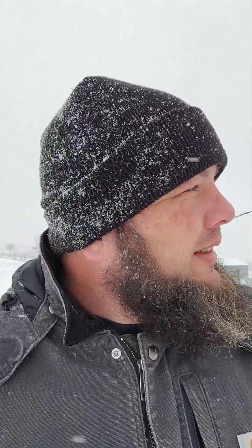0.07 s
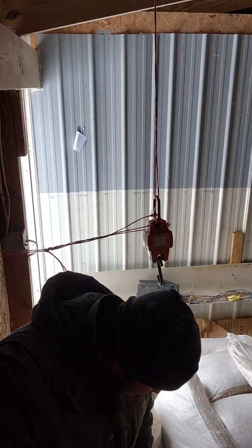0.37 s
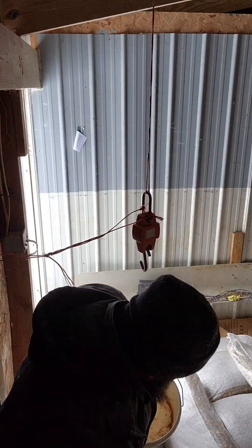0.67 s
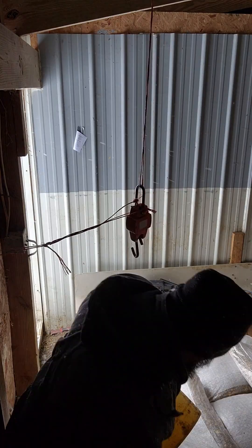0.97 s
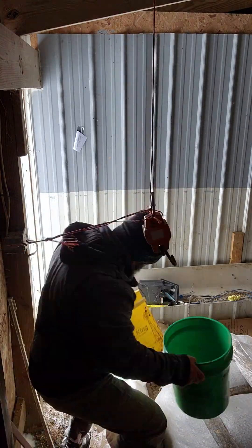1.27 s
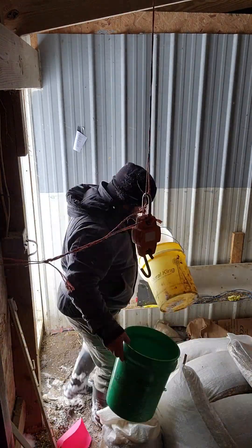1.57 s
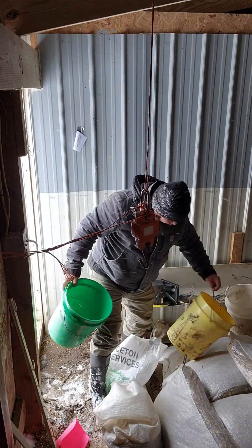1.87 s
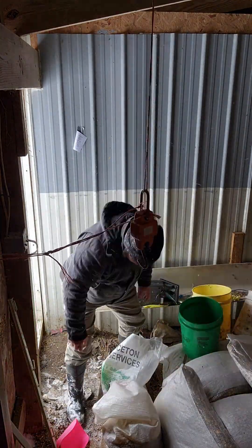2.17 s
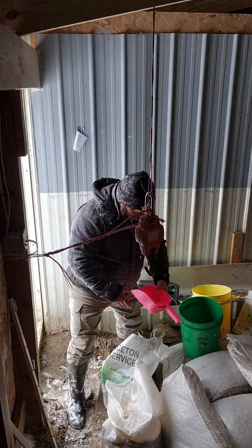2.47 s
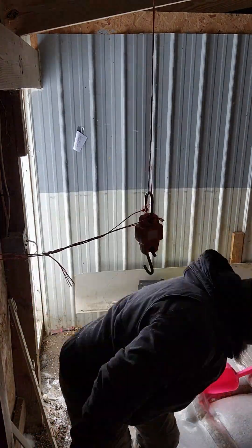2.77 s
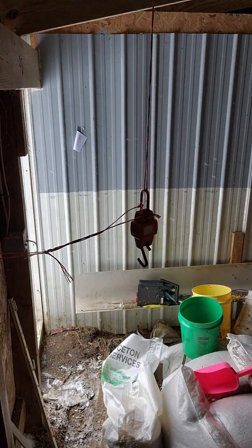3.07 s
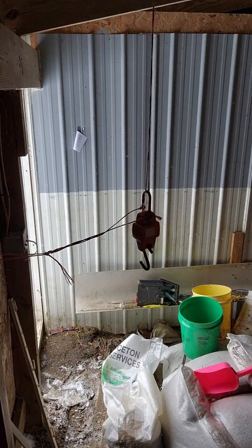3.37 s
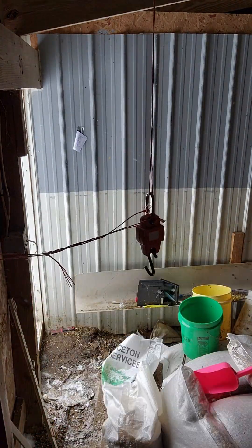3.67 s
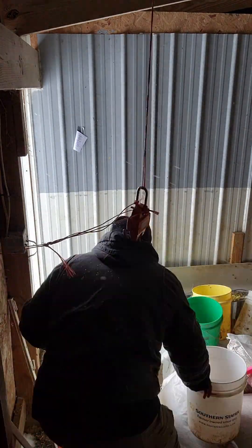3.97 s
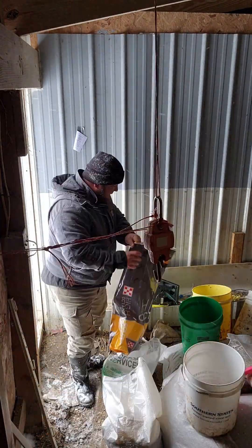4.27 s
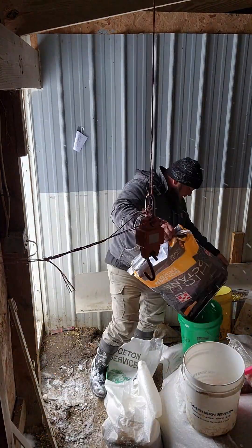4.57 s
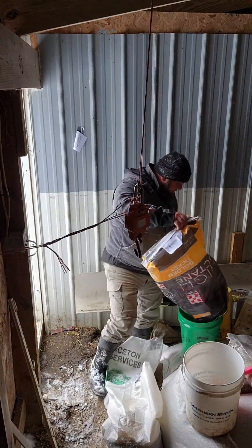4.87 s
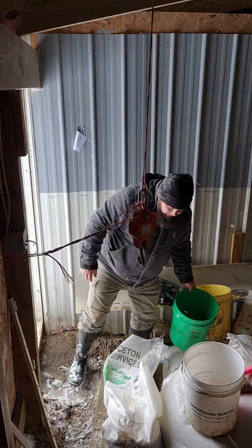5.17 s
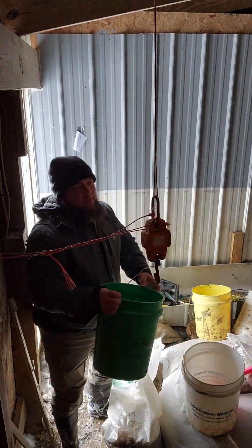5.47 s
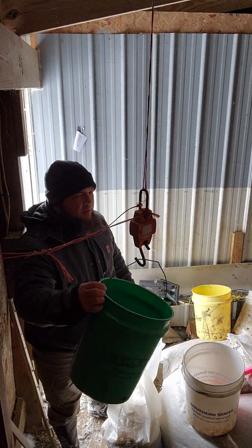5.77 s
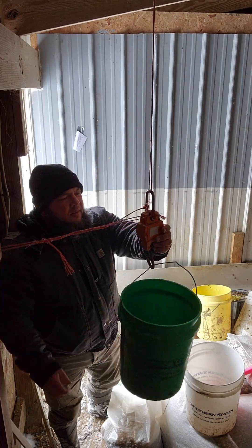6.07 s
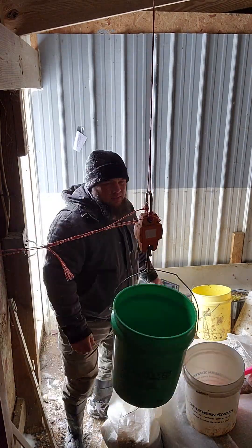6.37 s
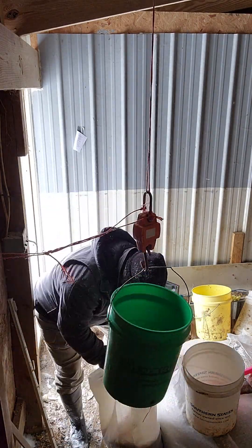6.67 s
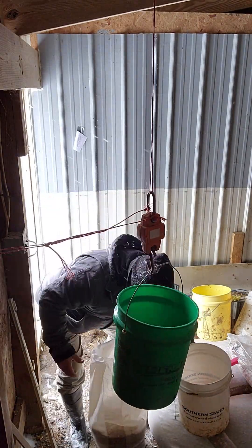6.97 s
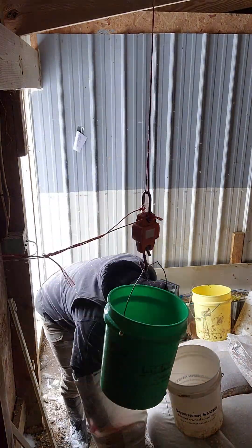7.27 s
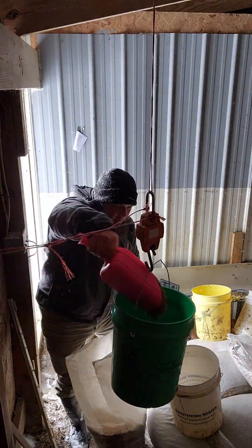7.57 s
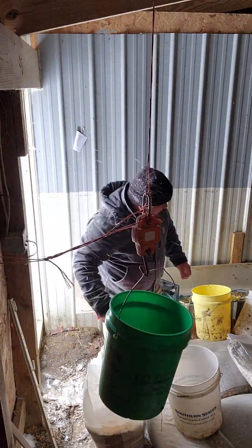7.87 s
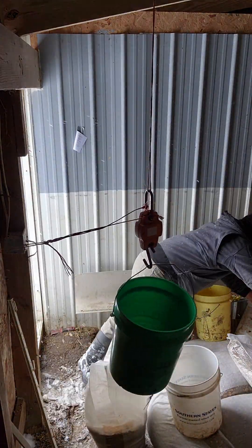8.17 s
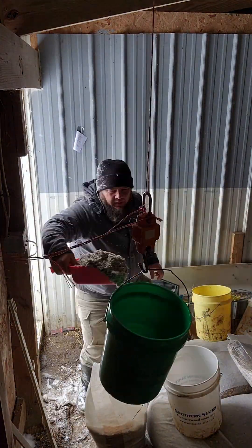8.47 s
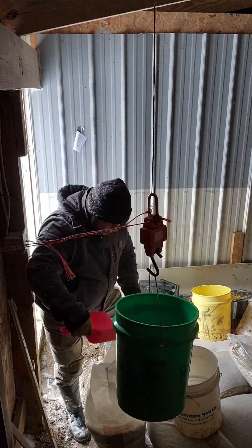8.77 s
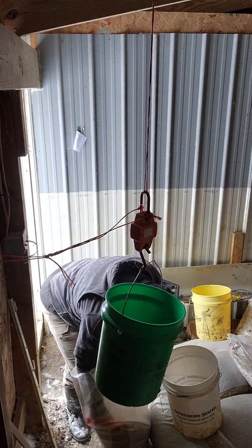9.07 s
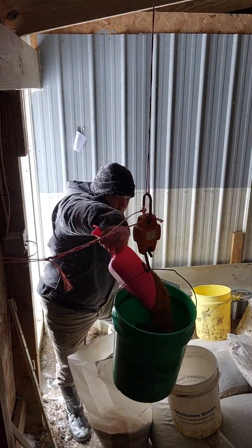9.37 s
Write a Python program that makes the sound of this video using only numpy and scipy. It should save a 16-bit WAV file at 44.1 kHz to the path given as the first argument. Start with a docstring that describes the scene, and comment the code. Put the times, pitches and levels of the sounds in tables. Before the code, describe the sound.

Plastic buckets clatter with ringing wire handles, followed by a crinkling feed sack, a short pour of pellets and quiet scooping.

```python
"""A gust buffets the microphone. Then, in a sheet-metal feed shed, a man in a stiff coat sorts plastic
buckets: wire handles clack and ring, walls knock and scuff, the coat rubs. A feed sack crackles as its
folds buckle and is emptied into a bucket in a stream of grains. He hangs a bucket on the scale hook,
then digs a plastic scoop into a sack, pellets rasping. The steel walls return a short echo of each
contact; a dull wash of wind and shuffling lies underneath."""
import sys
import numpy as np
from scipy import signal
from scipy.fft import rfft, irfft, next_fast_len
from scipy.io import wavfile
from scipy.ndimage import uniform_filter1d, map_coordinates

SR = 44100
rng = np.random.default_rng(int(sys.argv[2]) if len(sys.argv) > 2 else 0)


def wav_record(signal):
    """Record a signal, one row per channel, as 16-bit PCM in the file named by sys.argv[1]."""
    frames = np.transpose(np.atleast_2d(signal))
    bounded = np.clip(frames, -1, 1)
    # unit amplitude maps onto the largest positive 16-bit level
    quanta = np.round(bounded * 32767).astype(np.int16)
    wavfile.write(sys.argv[1], SR, quanta)


N = 415863
AGE_S = np.arange(SR // 5) / SR  # time since a contact

# bucket wall modes: pitch_hz, level_db, t60_s
WALL_MODES = [(134.5, -9.5, 0.22), (200, -6.5, .16), (288, -2.5, 0.077), (410, -2.5, 0.04),
              (480, -2.5, 0.033), (554, -2.5, 0.1), (634, -1, 0.049), (779, 3, 0.042), (897, -3.5, 0.063),
              (1046, 1, 0.058), (1148, 8, 0.032), (1423, 5, 0.046), (2014, 8.5, 0.028)]
# rim rattle: freq_hz, density_db
RIM_SPECTRUM = [(700, -40.5), (1500, -8), (2200, 2.5), (2700, -1.5), (3800, 5), (5500, 0), (8000, -5),
                (16000, -45)]
# bright crack: freq_hz, density_db
CRACK_SPECTRUM = [(2500, -38.5), (6000, -3), (8000, -0.5), (11500, 4.5), (15500, 2.5)]
# hard click: freq_hz, density_db
CLICK_SPECTRUM = [(500, -10.5), (2000, 5.5), (3400, 1.5), (4500, -5), (5600, 5.5), (7000, 3), (9000, -2),
                  (12500, 2.5), (16000, 6.5)]
# blows on a bucket: start_s, wall_db, centre_hz, rim_db, crack_db
BUCKET_KNOCKS = [(0.524, -34, 640, -42, -37), (.578, -32, 856, -54, -39), (1.098, -26.5, 880, -42, -51),
                 (1.18, -31.5, 523, -44, -54), (1.206, -26, 1140, -35, -40),
                 (1.221, -26.5, 915, -21, -27.5), (1.231, -30, 450, -21, -31), (1.2535, -32, 905, -25, -31),
                 (1.309, -32, 825, -40, -34.5), (1.463, -36, 726, -26.5, -44),
                 (1.509, -42.5, 805, -39, -42), (1.578, -38.5, 676, -38.5, -40.5),
                 (1.94, -27.5, 560, -36, -22.5), (1.955, -29.5, 496, -36.5, -21),
                 (1.969, -28, 490, -34, -23), (2.059, -37, 447, -40.5, -31.5),
                 (2.073, -36, 520, -36.5, -21.5), (2.088, -36, 427, -43, -36), (2.106, -31, 752, -35, -22),
                 (2.141, -42, 780, -36, -19.5), (2.167, -48, 905, -47, -30), (3.084, -34.5, 670, -38, -47),
                 (3.238, -34.5, 814, -31.5, -29), (3.428, -38.5, 970, -46, -29.5),
                 (3.485, -32, 810, -47, -31), (3.693, -28.5, 780, -35, -40), (5.016, -46, 613, -35.5, -26),
                 (5.414, -40, 930, -41, -46.5), (7.63, -43, 215, -48, -30), (8.122, -37.5, 544, -51, -40.5),
                 (8.13, -47, 130, -48, -58), (8.264, -43, 603, -50, -47), (8.611, -52, 201, -42, -38.5),
                 (8.658, -54.5, 592, -57, -39), (8.706, -54, 190, -52.5, -48.5),
                 (9.394, -45.5, 238, -46, -44), (9.411, -61, 261, -63, -38)]


def bucket_knocks():
    """The wall booms in the modes near centre_hz, under a rim rattle and a bright crack."""
    usual_t60_s, usual_rim_db, halving_db = 0.038, -37.5, 36.5
    out = np.zeros((2, N))
    for start_s, wall_db, centre_hz, rim_db, crack_db in BUCKET_KNOCKS:
        modes = [(hz, db - 11 * abs(np.log2(hz / centre_hz)) ** 1.2, t60) for hz, db, t60 in WALL_MODES]
        wall = amp(wall_db - 2.5) * ring(modes, scatter_db=5.5, skew_rad=1.0)
        t60_s = usual_t60_s * 2 ** ((usual_rim_db - rim_db) / halving_db)  # harder blows die faster
        crack = burst(CRACK_SPECTRUM, t60_s)
        impact = amp(-10.5) * burst(CLICK_SPECTRUM, t60_s=0.009, rise_s=0.0003)
        rim = amp(rim_db - 4) * burst(RIM_SPECTRUM, t60_s)
        add(out, start_s, wall + rim + amp(crack_db - 2.5) * (crack + impact))
    return out


# modes of a struck part: pitch_ratio, level_db, t60_share
PART_MODES = [(1, 5, 0.79), (0.3, -10, 0.65), (1.1, -9, 1), (0.75, -7.5, 0.5), (1.8, -16, 0.76)]
# wire handle modes: pitch_hz, level_db
WIRE_MODES = [(2750, -4.5), (5450, 2), (5750, 4.5), (6350, -2), (7450, -2.5), (8400, -5), (9300, -7),
              (11150, -1), (11760, 0.5), (12750, -1.5), (14700, -7)]
# balance of a ring: pitch_hz, left_minus_right_db
RING_PAN = [(1120, 0), (1280, 4), (1550, 9), (1950, 3), (2080, -6.5), (3400, 1), (4200, 2), (5200, -11)]
# handles, hook, scoop and loose gear: start_s, click_db, pitch_hz, ring_db
GEAR_CLACKS = [(.205, -34, 1505, -35.5), (.217, -40, 1530, -34), (.228, -31.5, 2090, -39),
               (.252, -44, 1380, -45), (.298, -44.5, 1400, -50), (0.329, -31, 1380, -22.5),
               (0.33, -40, 1207, -25.5), (.579, -22.5, 2080, -14), (.58, -31, 3510, -23.5),
               (.581, -43, 1570, -27), (.699, -39.5, 2050, -38), (0.781, -39, 1385, -30),
               (.794, -40, 1277, -20.5), (.988, -49, 6300, -49.5), (1.026, -39.5, 1120, -32.5),
               (1.099, -35.5, 1230, -31), (1.437, -40.5, 3400, -33), (1.465, -47, 3350, -27.5),
               (1.487, -50, 3430, -32), (1.759, -44, 1294, -36.5), (2.1054, -23, 2050, -28),
               (3.628, -37, 985, -21.5), (3.655, -29.5, 1115, -28), (3.695, -27, 1145, -12),
               (3.696, -50, 5180, -28.5), (3.717, -41, 5180, -35.5), (4.585, -58, 2010, -37),
               (5.359, -44, 2170, -40), (5.377, -51, 2200, -39.5), (5.828, -56, 4230, -62),
               (6.38, -55, 2200, -59), (7.622, -28, 1922, -45), (8.613, -44, 1990, -40),
               (9.392, -30.5, 1930, -37)]


def gear_clacks():
    """A hard contact clicks, shakes the wire and rings briefly at the pitch of the struck part."""
    t60_cycles, wire_t60_s = 68, 0.05
    wire_modes = [(hz, db, wire_t60_s) for hz, db in WIRE_MODES]
    out = np.zeros((2, N))
    for start_s, click_db, pitch_hz, ring_db in GEAR_CLACKS:
        modes = [(pitch_hz * ratio, db, t60_cycles / pitch_hz * share) for ratio, db, share in PART_MODES]
        pan_db = along(RING_PAN, pitch_hz)
        tone = ring(modes, scatter_db=0.5, skew_rad=0.86) * amp([[pan_db / 2], [-pan_db / 2]])
        click = amp(-6) * burst(CLICK_SPECTRUM, t60_s=0.059)
        wire = amp(-12) * ring(wire_modes, scatter_db=5, skew_rad=1.0)
        add(out, start_s, amp(ring_db - 7) * tone + amp(click_db) * (click + wire))
    return out


# slides of bucket, sack and scoop: start_s, length_s, level_db
SLIDES = [(0.535, .043, -42), (0.569, 0.014, -36), (0.583, 0.033, -45.5), (0.781, 0.032, -33.5),
          (1.095, .026, -41.5), (1.231, 0.028, -40), (1.332, 0.029, -41.5), (1.397, .05, -51),
          (1.476, .11, -45), (1.857, .09, -48.5), (1.945, .04, -42), (2.544, 0.048, -51),
          (3.423, 0.011, -34.5), (5.356, 0.033, -41.5), (6.813, .068, -58), (7.598, 0.04, -48)]


def scuffs():
    """Quick stick and slip swells and dies within each short slide."""
    out = np.zeros((2, N))
    slips = grains(per_s=560, spread_db=7, life_s=0.001, bed=0.3)
    for start_s, length_s, level_db in SLIDES:
        size = round(length_s * SR)
        scrape = noise(CLICK_SPECTRUM, size, slips[round(start_s * SR):][:size])
        add(out, start_s, amp(level_db) * scrape * signal.windows.tukey(size, 0.5))
    return out


# dull flap: freq_hz, density_db
FLAP_SPECTRUM = [(80, -46.5), (200, -33), (450, 6.5), (950, 13), (1400, -1), (2500, -38.5)]
# sharp snaps of sack and coat, and dull knocks of the scoop: start_s, flap_db, crinkle_db
SNAPS_AND_KNOCKS = [(1.7305, -52, -44.5), (1.772, -70, -42), (2.266, -60, -54), (2.547, -52, -45.5),
                    (2.561, -44, -52), (2.658, -42, -49.5), (2.773, -44, -60), (2.927, -34.5, -50.5),
                    (2.946, -35, -46.5), (2.974, -40, -53), (3.0185, -37, -51), (3.203, -32, -32.5),
                    (3.5125, -40, -41), (3.5826, -49, -34), (3.655, -28, -35.5), (3.749, -37, -36.5),
                    (3.784, -35, -37), (3.845, -40, -35), (3.881, -37, -52), (3.909, -45, -42),
                    (3.973, -37.5, -37), (4.06, -43, -41), (4.11, -35.5, -33.5), (4.2275, -40, -29),
                    (4.302, -40, -31.5), (4.484, -42.5, -37), (4.98, -47, -34), (5.024, -46, -29.5),
                    (5.125, -36.5, -31.5), (5.218, -51, -51), (5.314, -71, -50), (5.342, -41.5, -45),
                    (5.986, -63, -52.5), (6.047, -73, -58.5), (6.657, -46.5, -52.5), (6.877, -46.5, -52.5),
                    (7.171, -40.5, -56), (7.821, -43, -55), (7.977, -43.5, -61), (8.043, -43, -61),
                    (8.199, -45, -50), (8.3035, -44, -58), (8.422, -50, -69), (8.96, -45, -51.5)]


def snaps(rows):
    """A fold buckles or the scoop knocks: a dull flap, a bright crinkle and a tick that grows with both."""
    out = np.zeros((2, N))
    for start_s, flap_db, crinkle_db in rows:
        flap = amp(flap_db - 5) * burst(FLAP_SPECTRUM, t60_s=0.053, rise_s=0.0022)
        tick = amp((flap_db + crinkle_db) / 2 - 6.5) * burst(RIM_SPECTRUM, t60_s=0.054, rise_s=0.0006)
        crinkle = amp(crinkle_db - 1.5) * burst(CRACK_SPECTRUM, t60_s=0.032, rise_s=0.0046)
        add(out, start_s, flap + tick + crinkle)
    return out


def small_folds(rubbing):
    """Folds buckle by chance while something rubs, in proportion to the rubbing."""
    tries_per_s, scatter_db, threshold_db = 6.2, 2.5, -75
    when, size = rng.random((int(tries_per_s * N / SR), 2)).T
    rub_db, hiss_db = 20 * np.log10(rubbing[:, (when * N).astype(int)]) + scatter_db * (2 * size - 1)
    flap_db, crinkle_db = rub_db + 11.5, hiss_db + 8
    folds = np.transpose([when * N / SR, flap_db, crinkle_db])
    return snaps(folds[rub_db > threshold_db])


# falling feed: freq_hz, density_db
POUR_SPECTRUM = [(900, -31.5), (1200, -8.5), (1750, -21.5), (2000, -3.5), (2200, -10.5), (2710, -15),
                 (3740, -3.5), (4910, -14), (5650, -2), (6300, -7.5), (7820, -6.5), (11200, -0.5),
                 (13300, -5.5), (15200, -8.5)]
# flow from the tipped sack: time_s, rush_db, hiss_db
POUR_FLOW = [(4.17, -66, -66), (4.2, -53.5, -47), (4.35, -56.5, -51), (4.4, -45.5, -43), (4.5, -51.5, -41),
             (4.57, -46.5, -33), (4.67, -50, -39.5), (4.9, -45.5, -42.5), (5.0, -53.5, -53)]


def feed_pour():
    """A dense stream of pellets into the bucket swells, thins and stops."""
    pellets = grains(per_s=1500, spread_db=3.5, life_s=0.004, bed=0.46)
    return amp(2) * friction(gains(POUR_FLOW), POUR_SPECTRUM, pellets, split_hz=7160)


# stiff sack: freq_hz, density_db
SACK_SPECTRUM = [(530, -20), (900, -2.5), (1200, -3), (1650, -18), (2020, -8.5), (2500, -6), (3750, -3),
                 (4800, -8.5), (5650, -2.5), (6800, -2.5), (8500, -4), (11200, -5.5), (13300, -4),
                 (16000, -3.5)]
# grips on the sack: start_s, length_s, flap_db, crinkle_db
SACK_GRIPS = [(3.17, 0.095, -45, -39.5), (3.27, .15, -51.5, -49), (3.47, 0.041, -43.5, -42),
              (3.6, 0.14, -48, -45.5), (3.77, 0.091, -48.5, -43), (3.91, 0.035, -46.5, -46),
              (3.96, 0.057, -63.5, -62), (4.065, 0.068, -50.5, -49), (4.14, 0.067, -60.5, -62),
              (5.05, 0.039, -51, -45), (5.125, 0.038, -56.5, -50)]


def sack_crumple():
    """The stiff sack crumples in coarse grains at each grip."""
    grips = strokes(SACK_GRIPS, rise_s=0.0091, fall_s=0.0034)
    creases = grains(per_s=500, spread_db=6.5, life_s=0.0051, bed=0.18)
    return friction(grips, SACK_SPECTRUM, creases, split_hz=6100)


# pellets on plastic: freq_hz, density_db
RASP_SPECTRUM = [(900, -30), (1500, -4), (1700, -12), (2040, -2), (2500, -9), (3200, -2), (3900, 3),
                 (5100, -7), (7200, -4), (8900, -8), (12000, -5), (14900, -5), (16000, -11)]
# sack mouth and scoop sliding over feed: start_s, length_s, rub_db, hiss_db
SCOOP_DIGS = [(6.54, 0.34, -63, -64.5), (6.9, .27, -65.5, -74), (7.17, .3, -57, -61.5),
              (7.48, 0.21, -65.5, -68), (7.79, .2, -66, -66.5), (8.05, 0.27, -61, -59.5),
              (8.48, 0.25, -67, -64.5), (8.89, 0.3, -59, -67), (9.13, 0.15, -58, -57),
              (9.32, 0.13, -66.5, -65)]


def scoop_rasp(digs):
    """Pellets rasp on the scoop with each dig."""
    pellets = grains(per_s=220, spread_db=7, life_s=0.0045, bed=1.0)
    return friction(digs, RASP_SPECTRUM, pellets, split_hz=10000)


# stiff cloth: freq_hz, density_db
COAT_SPECTRUM = [(880, -35), (1500, -1), (1670, -23.5), (2040, 0), (2490, -13), (2770, -3), (3180, -2),
                 (3880, 1), (5120, -7.5), (7170, -5.5), (8920, -9), (12900, -6), (13900, -7.5), (14900, -4),
                 (16000, -17)]
# bends and reaches, and last a faint scrape in the lull: start_s, length_s, rub_db, hiss_db
COAT_RUBS = [(.51, 0.068, -70, -78), (.7, 0.16, -63, -70), (.96, 0.11, -74, -74), (1.39, 0.16, -66, -79),
             (1.67, 0.35, -68, -66.5), (2.26, 0.082, -63, -63.5), (2.56, 0.27, -73, -73),
             (2.92, 0.22, -62.5, -71), (5.18, 0.43, -72.5, -71.5), (5.56, 0.075, -78, -65),
             (5.7, .35, -79.5, -83)]


def coat_rustle(rubs):
    """Cloth rubs in fine grains as he reaches, and stirs faintly until he stands at the scale."""
    start_s, end_s, rub_db, hiss_db = 0.23, 5.55, -75, -81
    stir = strokes([(start_s, end_s - start_s, rub_db, hiss_db)], fall_s=0.62)
    slips = grains(per_s=670, spread_db=12.5, life_s=0.0039, bed=0.6)
    return friction(rubs + stir, COAT_SPECTRUM, slips, split_hz=8900)


# wind on the microphone: freq_hz, density_db
GUST_SPECTRUM = [(15, -43), (25, -9), (113, 0), (219, -10.5), (382, -4.5), (436, -12), (498, -6),
                 (703, -12), (2250, -32.5), (5260, -61), (9410, -65), (14000, -51.5)]
# opening gust: time_s, level_db
GUST_LEVEL = [(0, -34), (.03, -37.5), (.1, -34), (.13, -30), (.16, -33.5), (.195, -39), (.207, -45),
              (.23, -110)]


def gust():
    """Outdoor wind buffets the microphone with an unsteady rumble."""
    return gains(GUST_LEVEL)[0] * amp(3 * wobble(knots_per_s=60)) * noise(GUST_SPECTRUM, N)


# shed reverberation: freq_hz, t60_s
SHED_DECAY = [(200, .22), (1500, 0.12), (6000, 0.15), (15000, 0.093)]


def shed_echo(x):
    """Steel walls reflect; sacks and a dirt floor keep the tail short."""
    hz, time_s, frames = signal.stft(rng.standard_normal((2, SR // 2)), SR, nperseg=256)
    decay = amp(-60 * time_s / along(SHED_DECAY, hz)[:, None])
    tail = signal.istft(frames * decay, SR, nperseg=256)[1]
    delayed = np.pad(x, ((0, 0), (SR // 200, 0)))  # 5 ms
    return signal.fftconvolve(delayed, tail / np.linalg.norm(tail[0]), axes=1)[:, :N]


# wind and shuffling indoors: time_s, level_db
WASH_LEVEL = [(0.22, -54.5), (1.06, -53.5), (1.35, -52), (2.58, -55.5), (2.86, -53.5), (3.12, -51),
              (4.25, -53), (4.73, -53.5), (4.94, -50), (5.15, -55), (6.38, -59), (7.25, -49.5), (7.45, -54),
              (8.22, -55.5), (8.71, -61), (8.91, -63), (9.09, -56), (9.43, -61)]
# dull wash: freq_hz, density_db
WASH_SPECTRUM = [(24, -84), (40, -61), (156, -20.5), (193, -12.5), (228, -11.5), (281, -2.5), (437, 2),
                 (598, -2.5), (802, 1.5), (1410, -9.5), (1670, -16.5), (2100, -18), (2490, -21),
                 (3800, -20), (4600, -31.5), (7200, -30), (8500, -39), (16000, -48.5)]
# still air: freq_hz, density_db
HUSH_SPECTRUM = [(20, -5.5), (60, -8), (130, -1), (250, 1.5), (1000, -16), (4000, -26.5), (8000, -27),
                 (16000, -27)]


def shed_air():
    """A dull wash of wind and shuffling wavers over still air."""
    wash = gains(WASH_LEVEL)[0] * amp(0.5 + 1.1 * wobble(knots_per_s=25)) * noise(WASH_SPECTRUM, N)
    return wash + amp(-76.5) * noise(HUSH_SPECTRUM, N)


# stereo width: freq_hz, side_minus_mid_db
STEREO_WIDTH = [(100, -9.5), (380, -12.5), (700, -21.5), (1290, -15), (2380, -12), (4400, -9), (8120, -2.5),
                (15000, 0)]


def noise(spectrum, size, grain=1):
    """Coloured stereo noise of rms 1, widest in the treble; grain shapes it before colouring."""
    white = grain * rng.standard_normal((2, size))
    mid, side = filtered(white, lambda hz: amp(along(spectrum, hz) + [0 * hz, along(STEREO_WIDTH, hz)]))
    return unit(np.array([mid + side, mid - side]))


def ring(modes, scatter_db, skew_rad):
    """Decaying modes struck at random strengths; high ones differ in phase between left and right."""
    hz, db, t60_s = np.transpose(modes)[:, :, None]
    size, detune, start, lag = rng.standard_normal((4, len(modes), 1))
    phase = 2 * np.pi * hz * (1 + 0.006 * detune) * AGE_S + np.pi * start
    shift = skew_rad * np.tanh(lag) * hz / (hz + 4000)
    attack = 1 - np.exp(-AGE_S / 0.0011)
    envelope = attack * amp(db + scatter_db * size - 60 * AGE_S / np.maximum(t60_s, 0.004))
    return unit_energy(np.array([(envelope * np.sin(phase + side * shift)).sum(0) for side in (1, -1)]))


def burst(spectrum, t60_s, rise_s=0.0016):
    """The dying noise of one contact; it chatters as the surfaces settle."""
    chatter = amp(2 * np.interp(AGE_S, np.arange(80) / 400, rng.standard_normal(80)))
    source = patches(noise(spectrum, len(AGE_S)), depth_db=3.5, hold_frames=8)
    envelope = amp(-60 * AGE_S / max(t60_s, 0.004)) * (1 - np.exp(-AGE_S / rise_s))
    return unit_energy(source * chatter * envelope)


def friction(swell, spectrum, grain, split_hz):
    """Grainy rubbing with separate gains below and above split_hz."""
    rub = patches(noise(spectrum, N, grain), depth_db=2.5, hold_frames=5)
    low = filtered(rub, lambda hz: 1 / (1 + (hz / split_hz) ** 6))
    return swell[0] * unit(low) + swell[1] * unit(rub - low)


def grains(per_s, spread_db, life_s, bed):
    """Envelope of many tiny slips of uneven size above a smooth bed."""
    slips = amp(spread_db * np.minimum(rng.exponential(size=N), 3.5)) * (rng.random(N) < per_s / SR)
    power = signal.fftconvolve(slips ** 2, np.exp(-2 * AGE_S / life_s))[:N]
    return np.sqrt(power / power.mean() + bed)


def patches(x, depth_db, hold_frames):
    """Each crease sounds its own pitches: random gains over bands some 500 Hz wide."""
    frames = signal.stft(x, nperseg=256)[2]
    field = uniform_filter1d(rng.standard_normal(frames.shape[1:]), size=3, axis=0)
    field = uniform_filter1d(field, size=hold_frames, axis=1)
    return unit(signal.istft(frames * amp(depth_db * unit(field)), nperseg=256)[1][:, :x.shape[1]])


def strokes(rows, rise_s=0.03, fall_s=0.03):
    """Low and high band gains: each stroke swells, holds for its length and dies away."""
    t = np.arange(N) / SR
    swell = np.zeros((2, N))
    for start_s, length_s, low_db, high_db in rows:
        outside = np.maximum(start_s - t, 0) / rise_s + np.maximum(t - start_s - length_s, 0) / fall_s
        swell = np.maximum(swell, amp([[low_db], [high_db]]) * np.exp(-np.minimum(outside, 20)))
    return swell


def gains(rows):
    """Gain per sample for each dB column, silent outside the table."""
    time_s, *columns = np.transpose(rows)
    return [amp(np.interp(np.arange(N) / SR, time_s, db, left=-120, right=-120)) for db in columns]


def wobble(knots_per_s):
    """A smooth random curve."""
    knots = rng.standard_normal(int(N * knots_per_s / SR) + 4)
    return map_coordinates(knots, [np.arange(N) * knots_per_s / SR])


def filtered(x, response):
    """Apply a frequency response."""
    size = x.shape[-1]
    padded = next_fast_len(size + 4096)
    return irfft(rfft(x, padded) * response(np.fft.rfftfreq(padded, 1 / SR)), padded)[..., :size]


def along(points, hz):
    """Interpolate (freq_hz, value) points on a log axis."""
    freq_hz, values = np.transpose(points)
    return np.interp(np.log(hz + 1), np.log(freq_hz + 1), values)


def add(track, start_s, sound):
    """Mix a short sound into the track."""
    span = track[:, max(round(start_s * SR), 0):][:, :sound.shape[1]]
    span += sound[:, :span.shape[1]]


def amp(db):
    """Decibels to gain."""
    return 10 ** (np.asarray(db) / 20)


def unit(x):
    """Scale to rms 1."""
    return x / np.sqrt(np.mean(x ** 2) + 1e-20)


def unit_energy(x):
    """Scale to the energy of 10 ms at rms 1."""
    return unit(x) * np.sqrt(SR / 100 / x.shape[-1])


def scene():
    """Contacts, with their deep bass filtered out, and their echo over rustle and air."""
    rubs, digs = strokes(COAT_RUBS), strokes(SCOOP_DIGS)
    rustle = coat_rustle(rubs) + scoop_rasp(digs) + sack_crumple() + feed_pour()
    air = gust() + shed_air()
    hits = gear_clacks() + bucket_knocks() + scuffs() + snaps(SNAPS_AND_KNOCKS) + small_folds(rubs + digs)
    contacts = filtered(hits, lambda hz: (1j * hz / (100 + 1j * hz)) ** 3)  # high-pass
    return contacts + amp(-24.5) * shed_echo(contacts) + rustle + air


def record(dry):
    """Steep low-pass at the band limit."""
    top_hz = 16100
    return filtered(dry, lambda hz: 1 / (1 + (hz / top_hz) ** 90))


dry = scene()
out = record(dry)
wav_record(out)
```